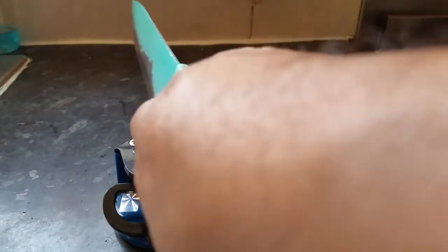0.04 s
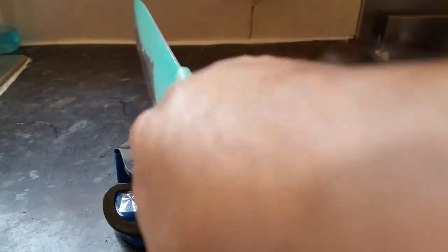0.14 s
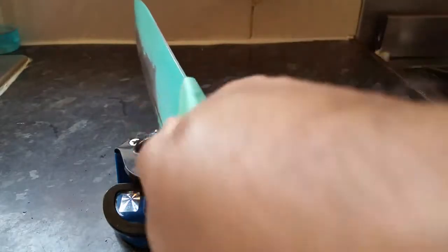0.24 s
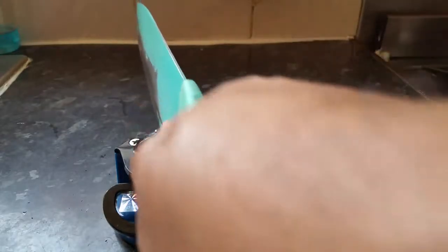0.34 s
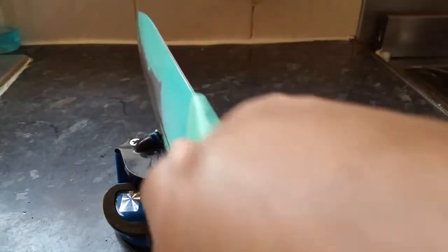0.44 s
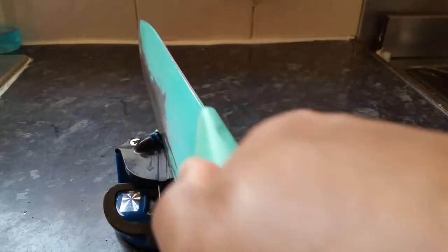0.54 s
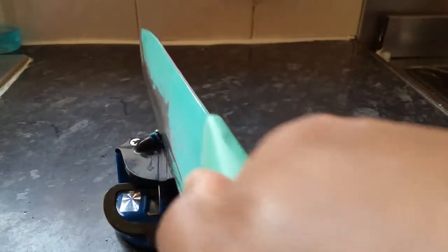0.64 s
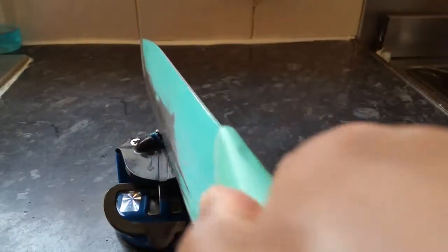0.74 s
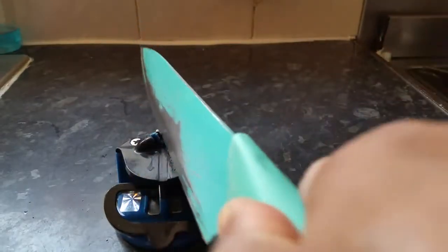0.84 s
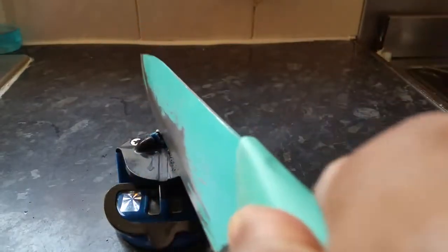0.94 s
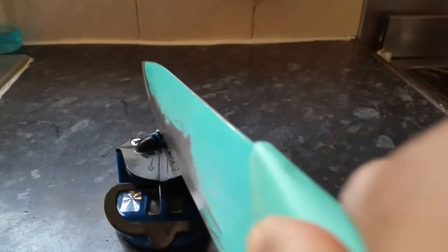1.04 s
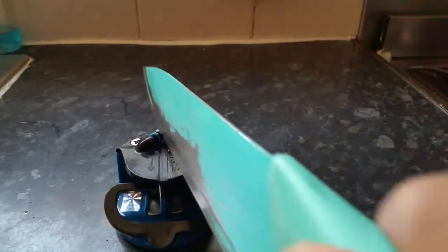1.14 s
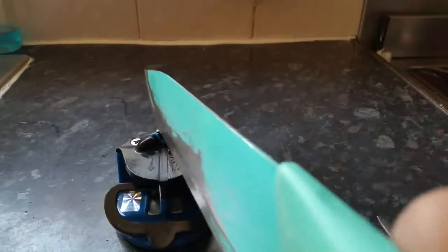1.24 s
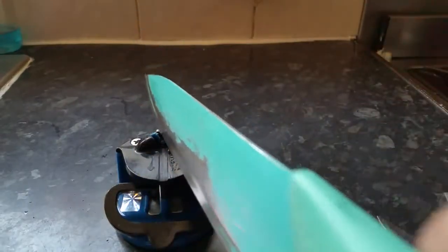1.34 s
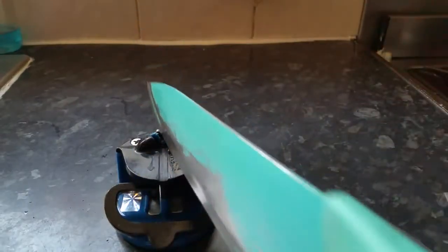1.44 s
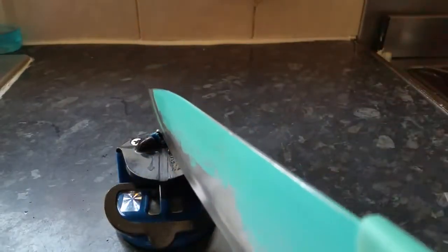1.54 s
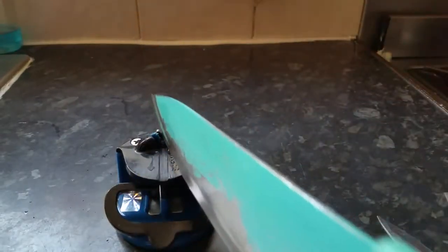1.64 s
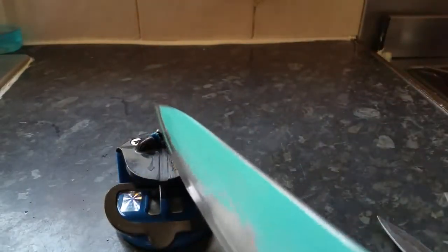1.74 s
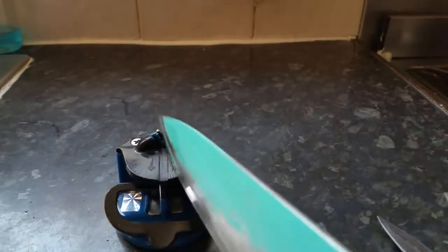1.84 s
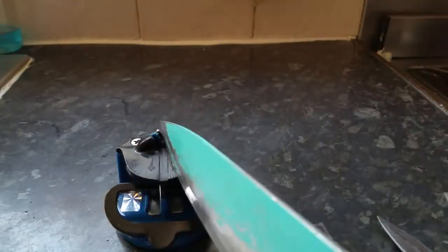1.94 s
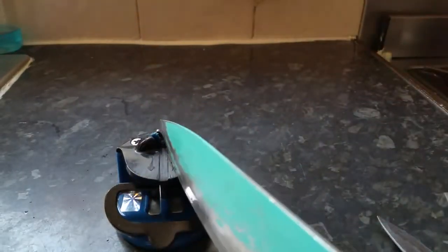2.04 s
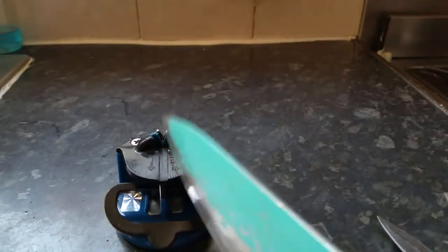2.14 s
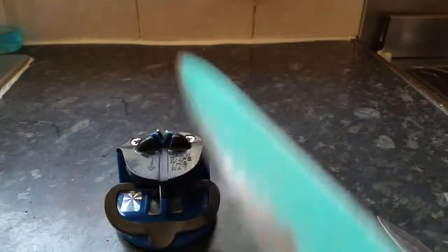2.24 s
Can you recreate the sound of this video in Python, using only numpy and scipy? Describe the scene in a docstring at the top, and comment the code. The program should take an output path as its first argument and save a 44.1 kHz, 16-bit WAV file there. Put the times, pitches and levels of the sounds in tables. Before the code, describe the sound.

A kitchen knife is pulled once through a sharpener, close by in a quiet kitchen. It slides in softly, then from about 0.2 to 0.7 seconds catches and judders, crunching brightly and thumping the worktop. The stroke settles into a more even, gritty grind with a slight metallic ring, growing gradually softer until the tip slips out just before 2 seconds. One light tap on the sharpener follows at 2.2 seconds.

```python
"""A kitchen knife is drawn once through a pull-through sharpener that stands on a worktop.
The blade slides into the slot, then catches and judders, thumping the worktop with a bright crunch.
It settles into a more even grind, grit ringing the blade and the housing, until the tip slips out
just before 2 s. A light tap on the sharpener follows in the quiet kitchen."""
import sys
import numpy as np
from scipy import signal
from scipy.fft import rfft, irfft
from scipy.io import wavfile

SR = 44100
rng = np.random.default_rng(int(sys.argv[2]) if len(sys.argv) > 2 else 0)


def dump_mix(stems):
    """Bounce the given channels to the path in sys.argv[1] as a 16-bit WAV at rate SR."""
    frames = np.atleast_2d(stems).T  # one column per channel
    limited = np.clip(frames, -1, 1)  # hard clip at full scale
    pcm = np.round(limited * 32767).astype(np.int16)
    wavfile.write(sys.argv[1], SR, pcm)


N = 101430
T = np.arange(N) / SR

# faders of the stroke: (time [s], edge rasp [dB], housing growl [dB], worktop rumble [dB])
STROKE_LEVELS = [(0.17, -60, -47, -42), (0.206, -52.5, -43.5, -41), (0.248, -37.5, -33, -23.5),
                 (0.278, -26.5, -24, -19), (0.332, -33, -38, -19), (0.388, -41, -36.5, -23),
                 (0.4, -46, -24, -46), (0.416, -40.5, -38, -28.5), (0.488, -26, -24, -13.5),
                 (0.51, -24.5, -19.5, -13.5), (0.682, -32, -23.5, -27), (0.714, -31, -26, -20),
                 (0.84, -30, -26.5, -20.5), (0.992, -34, -30.5, -31), (1.148, -34, -36, -29),
                 (1.184, -31.5, -27.5, -31.5), (1.352, -43, -40.5, -31.5), (1.384, -37.5, -39, -34),
                 (1.556, -35.5, -26.5, -26), (1.646, -46.5, -39.5, -34.5), (1.714, -41.5, -34, -39),
                 (1.74, -38, -28, -35), (1.776, -37.5, -33.5, -37.5), (1.928, -40, -36, -37),
                 (1.95, -54, -47, -39), (2.05, -63, -56, -56)]
# how the edge runs: (time [s], stick-slip flutter depth [dB], grinding trim [dB])
GRIP = [(0.2, 6, -3), (0.27, 3, -5), (0.3, 0.5, -1), (0.37, 7.2, 1), (0.42, 3, -0.5), (0.49, -1, -7.5),
        (0.6, 3, -1.5), (0.85, 1.5, 0.5), (1.3, 2.5, 0.5), (1.9, 1, 1.5)]
# the edge catches hard and jerks free: (time [s], grit burst [dB], thump [dB])
CATCHES = [(0.228, -37.5, -52), (0.247, -43, -14), (0.257, -38.5, -19), (0.2682, -25.5, -30),
           (0.2796, -26, -21), (0.3092, -20.5, -21), (0.32, -21, -13.5), (0.330, -24, -8),
           (0.339, -24.5, -4.5), (0.400, -31, -11), (0.432, -31, -7), (0.466, -29.5, -8.5),
           (0.476, -29, -12), (0.4851, -25.5, -5.5), (0.5001, -34, -8), (0.509, -27, -8.5),
           (0.521, -23, -11), (0.538, -26, -7), (0.549, -21.5, -10), (0.572, -24, -20), (0.598, -29, -16.5),
           (0.653, -23.5, -23), (0.661, -23.5, -27), (0.737, -31, -12.5), (1.051, -25.5, -42),
           (1.48, -33, -32), (1.568, -36, -20)]
# chips of grit snap: (time [s], level [dB])
CHIP_SNAPS = [(0.044, -59), (1.7708, -44)]
# tone curve of each layer: (frequency [Hz], gain [dB])
EDGE_EQ = [(500, -39.5), (1100, -2), (1500, 1), (2500, -1), (4300, -4.5), (6200, -3.5), (7300, -7.5),
           (9500, -11.5), (12000, -19.5), (14500, -22), (15700, -32)]
HOUSING_EQ = [(150, -21), (310, -11), (480, 0.5), (750, -4.5), (1080, -3), (1400, -11), (2500, -20),
              (8000, -54)]
WORKTOP_EQ = [(25, -38.5), (50, -15), (72, 0.5), (120, 4.5), (220, -3), (350, -1.5), (520, -11.5),
              (1000, -20), (4000, -75.5)]
SIZZLE_EQ = [(1000, -25), (4000, 7), (7000, -4), (10000, -2.5), (13500, -4), (15500, 0.5)]
SLIDE_EQ = [(800, -21.5), (1900, -14), (2700, -4.5), (3300, -27), (9000, -41)]
TAP_CRACK_EQ = [(500, -14), (2800, 0), (5000, -3), (9000, -13), (15000, -24)]
ROOM_TONE_EQ = [(25, -22), (70, -3.5), (150, -3), (290, 0), (400, -9), (614, -15), (1340, -23.5),
                (2300, -30.5), (3720, -33), (11500, -41.5), (15500, -44)]
# resonances of each part: (frequency [Hz], width [Hz], boost [dB])
EDGE_MODES = [(1563, 110, 8.5), (2298, 147, 9.5), (2761, 57, 9), (2990, 200, 6), (3522, 223, 10),
              (5190, 520, 9), (6210, 266, 9.5), (6444, 214, 6.5), (8390, 430, 5)]
POINT_MODES = [(4803, 55, 15), (8250, 810, 4), (13000, 8100, 3.8)]  # added when only the blade's point is left in the slot
HOUSING_HEEL_MODES = [(303.7, 63, 22.2), (390, 40, 3.7), (480, 36, 4.9), (595.5, 35, 9.5), (642.4, 23, 11),
                      (784, 18, 8.6), (877, 66, 4.6), (960, 99, 4.7), (1033, 23, 3.6), (1173, 12, 5.2)]
HOUSING_TIP_MODES = [(489, 20.3, 14.2), (521.7, 20, 8), (613, 24, 5.3), (859, 28, 8), (963, 48, 5.8),
                     (989, 31, 4.5), (1062, 26, 9.4)]
WORKTOP_MODES = [(80, 13, 3.7), (110.5, 23, 5.5), (128.4, 13.5, 5.2), (157.5, 5.1, 6), (170.8, 25, 6.3),
                 (207.4, 21, 10), (336.4, 27, 6.2)]
SIZZLE_MODES = [(8550, 440, 11), (11650, 410, 11.5), (15300, 400, 3.6)]
# ring of the tapped sharpener: (frequency [Hz], level [dB], time to fall 60 dB [s])
TAP_MODES = [(535, -4, 0.18), (580, -6, 0.085), (1096, -1.5, .04), (1590, -1, 0.02), (2060, -7, 0.043),
             (2750, -3, 0.019), (3220, -4, 0.016), (8100, -18, .01)]
# stereo image: (frequency [Hz], side over middle [dB], left over right [dB])
IMAGE = [(60, -3, 5), (151, -30, 2.5), (300, -15.5, 1.5), (580, -4.5, 0.2), (2550, -5.5, -0.3),
         (3400, -8, 2), (4200, 1, 2.5), (5300, -7.5, 1.5), (6500, -5.5, 1.5), (8200, -2.5, 6),
         (9800, -2, 4), (14000, 0, 0)]

EDGE_DB, HOUSING_DB, WORKTOP_DB = -1, -2, -1
CATCH_DB, CATCH_GROWL_DB, THUMP_DB, THUMP_LAG_S = 1.5, 0.5, -5.5, 0.00047
SLIPS_PER_S, SLIP_JITTER, SLIP_FALL_S, SLIP_SPREAD_DB = 98, .26, 0.0057, 2.5
JERK_SHARE = 0.54  # of the power that drives the rumble; the rest is grit
GRAINS_PER_S, GRAIN_SPREAD_DB = 14000, 2.5
MIDWAY_S, POINT_S, HANDOVER_S = 1.02, 1.628, 0.1  # the contact travels from heel to point
STALL_S, STALL_WIDTH_S, STALL_DB = 1.347, 0.0059, -6
EXIT_S, EXIT_FALL_S, EXIT_DB = 1.938, 0.0025, -3
CRUNCH_DB, BITE_S, CRUNCH_FADE_DB_PER_S = -4.5, 0.357, 83
SKID_DB, SIZZLE_LEFT_DB, SLIDE_DB = -41, 15.5, -56.5
TAP_S, TAP_DB, TAP_CRACK_DB = 2.2335, -41.5, -47.5
TAP_TRAVEL_S = 0.00158  # for a bending wave of 1 kHz
ROOM_T60_S, PREDELAY_S, KNIFE_SEND_DB, TAP_SEND_DB = 0.2, 0.0037, -12, -5.5
ROOM_TONE_DB, CUTOFF_HZ = -53.5, 15800


def sharpening():
    """Grinding and hard catches make the edge rasp, the housing growl and the worktop rumble."""
    edge_db, housing_db, worktop_db = in_time(STROKE_LEVELS)
    depth_db, trim_db = in_time(GRIP)
    contact = from_db(trim_db) * np.interp(T, [.15, .18, 2.03, 2.1], [0, 1, 1, 0])
    jerks, flutter = stick_slip()
    makeup_db = -depth_db ** 2 * np.log(10) / 20  # offsets the power that flutter adds
    grinding = contact * from_db(release_db() + depth_db * flutter + makeup_db)
    bursts = catches()
    rasp = grit() * np.hypot(grinding * from_db(edge_db + EDGE_DB), bursts)
    edge = handover(rasp, POINT_S, EDGE_EQ, EDGE_MODES, [*EDGE_MODES, *POINT_MODES])
    growl_bursts = bursts * from_db(CATCH_GROWL_DB)
    growl = grit() * np.hypot(grinding * from_db(housing_db + HOUSING_DB), growl_bursts)
    housing = handover(growl, MIDWAY_S, HOUSING_EQ, HOUSING_HEEL_MODES, HOUSING_TIP_MODES)
    rumble = worktop(contact * from_db(worktop_db + WORKTOP_DB), jerks)
    return stereo(*(edge + housing + rumble))


def grit():
    """Tiny fractures of uneven size along the edge, for middle and side."""
    sizes_db = GRAIN_SPREAD_DB * np.minimum(rng.exponential(1, (2, N)), 5)
    grains = from_db(sizes_db) * rng.choice([-1, 1], (2, N))
    return rms_one(grains * (rng.random((2, N)) < GRAINS_PER_S / SR))


def stick_slip(count=400):
    """The edge sticks and slips: an uneven train of jerks, and the flutter they give the grind."""
    gap, size = rng.standard_normal((count, 2)).T
    times = np.cumsum(np.exp(SLIP_JITTER * gap)) / SLIPS_PER_S
    jerks = clicks(times, from_db(SLIP_SPREAD_DB * size))
    pole = np.exp(-2 / (SLIP_FALL_S * SR))
    flutter = np.sqrt(signal.lfilter([1], [1, -2 * pole, pole * pole], jerks + 1e-12))
    return rms_one(jerks), rms_one(flutter - flutter.mean())


def catches():
    """Envelope of the bursts of grit that the hard catches throw."""
    return sum(from_db(db + CATCH_DB) * swell(s, rise_s=.0012, fall_s=.0016) for s, db, _ in CATCHES)


def release_db():
    """The edge loses bite in a brief stall, and again as the tip slips out and brushes the guide."""
    stall = np.exp(-((T - STALL_S) / STALL_WIDTH_S) ** 2)
    slipped_out = .5 + .5 * np.tanh((T - EXIT_S) / EXIT_FALL_S)
    return STALL_DB * stall + EXIT_DB * slipped_out


def handover(drive, at_s, eq, early_modes, late_modes):
    """A part's ring crossfades to other resonances as the contact moves along the blade."""
    share = .5 + .5 * np.tanh((T - at_s) / HANDOVER_S)
    early = filtered(drive * np.sqrt(1 - share), body(eq, early_modes))
    return early + filtered(drive * np.sqrt(share), body(eq, late_modes))


def worktop(level, jerks):
    """The low end: grit and jerks shake the worktop, and the hard catches thump it."""
    board = body(WORKTOP_EQ, WORKTOP_MODES)
    mid_only = [[1], [0]]
    push = level * (np.sqrt(1 - JERK_SHARE) * grit() + np.sqrt(JERK_SHARE) * jerks * mid_only)
    times, _, thump_db = np.transpose(CATCHES)
    thumps = clicks(times + THUMP_LAG_S, from_db(thump_db + THUMP_DB)) / irfft(board).max()
    return filtered(push + thumps * mid_only, board)


def sizzle():
    """Bright steel on the left: crunch strongest at the first bite, a hissing skid, snapping chips."""
    crunch = catches() * from_db(CRUNCH_DB - CRUNCH_FADE_DB_PER_S * np.abs(T - BITE_S))
    skid = from_db(SKID_DB) * swell(.36, rise_s=.019, fall_s=.013)
    snaps = sum(from_db(db) * swell(s, rise_s=.0002, fall_s=.0004) for s, db in CHIP_SNAPS)
    pan = from_db(SIZZLE_LEFT_DB * np.array([[.5], [-.5]]))
    return pan * filtered(grit() * (crunch + skid + snaps), body(SIZZLE_EQ, SIZZLE_MODES))


def slide():
    """A soft scrape as the blade slides lightly into the slot."""
    scrape = grit() * from_db(SLIDE_DB) * swell(.15, rise_s=.092, fall_s=.12)
    return stereo(*filtered(scrape, body(SLIDE_EQ)))


def tap():
    """One light knock on the sharpener: a crack, then a ring whose low bending waves arrive last."""
    envelope = from_db(TAP_CRACK_DB) * swell(TAP_S + TAP_TRAVEL_S / 2, rise_s=.0002, fall_s=.0021)
    knock = filtered(grit()[0] * envelope, body(TAP_CRACK_EQ))
    for hz, db, t60 in TAP_MODES:
        age = np.maximum(T - TAP_S - TAP_TRAVEL_S * np.sqrt(1000 / hz), 0)
        knock += from_db(TAP_DB + db - 60 * age / t60) * np.sin(2 * np.pi * hz * age)
    return knock


def kitchen_reverb(send):
    """Diffuse reflections of a small hard room, different at each ear."""
    tail = rng.standard_normal((2, N)) * from_db(-60 * T / ROOM_T60_S) * (T > PREDELAY_S)
    return filtered(send, rfft(rms_one(tail) / np.sqrt(N), 2 * N))


def room_tone():
    """A faint, steady bed of low noise."""
    return from_db(ROOM_TONE_DB) * stereo(*filtered(rng.standard_normal((2, N)), body(ROOM_TONE_EQ)))


def body(eq, modes=()):
    """Causal response of a part: a tone curve plus resonant peaks, at unit power."""
    hz, db = in_hz(eq)
    db = db + sum(boost / (1 + (2 * (hz - f) / width) ** 2) for f, width, boost in modes)
    cepstrum = irfft(np.log(rms_one(from_db(db))))
    minimum_phase = np.r_[1, np.full(N - 1, 2), 1, np.zeros(N - 1)]
    return np.exp(rfft(cepstrum * minimum_phase))


def stereo(mid, side):
    """Middle and side to left and right; widest and furthest left in deep bass and treble."""
    _, side_db, left_db = in_hz(IMAGE)
    side, pan = filtered(side, from_db(side_db)), from_db(left_db / 2)
    return np.array([filtered(mid + side, pan), filtered(mid - side, 1 / pan)])


def swell(peak_s, rise_s, fall_s):
    """Exponential attack up to a peak, and decay after it."""
    return np.exp(-np.maximum((peak_s - T) / rise_s, (T - peak_s) / fall_s))


def clicks(times, sizes):
    """Impulses at the given times."""
    return np.bincount((np.abs(times) * SR).astype(int), sizes, N)[:N]


def in_time(rows):
    """Columns of an automation curve at every sample."""
    times, *columns = np.transpose(rows)
    return [np.interp(T, times, c) for c in columns]


def in_hz(rows):
    """Frequency grid, and the columns of a spectrum on it."""
    hz = np.maximum(np.arange(N + 1) * SR / (2 * N), 1)
    points, *columns = np.transpose(rows)
    return [hz] + [np.interp(np.log(hz), np.log(points), c) for c in columns]


def filtered(x, response):
    """Apply a frequency response."""
    return irfft(rfft(x, 2 * N) * response)[..., :N]


def from_db(db):
    """Decibels to gain."""
    return 10 ** (np.asarray(db) / 20)


def rms_one(x):
    """Scale to unit rms."""
    return x / np.sqrt(np.mean(x ** 2) + 1e-20)


def scene():
    """The mix: knife and tap up front, kitchen reverb and room tone behind."""
    knife = slide() + sharpening() + sizzle()
    knock = tap()
    send = from_db(KNIFE_SEND_DB) * knife + from_db(TAP_SEND_DB) * knock
    return knife + knock + room_tone() + kitchen_reverb(send)


def record(dry):
    """A steep low-pass takes off the very top."""
    return signal.sosfilt(signal.ellip(12, .1, 80, CUTOFF_HZ, fs=SR, output="sos"), dry)


dry = scene()
out = record(dry)
dump_mix(out)
```